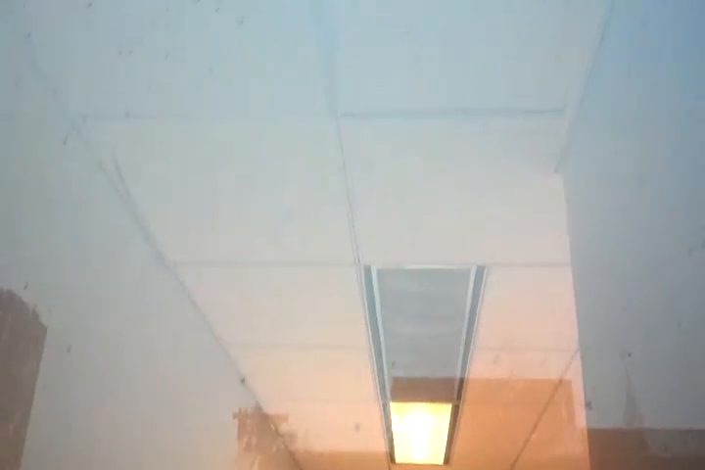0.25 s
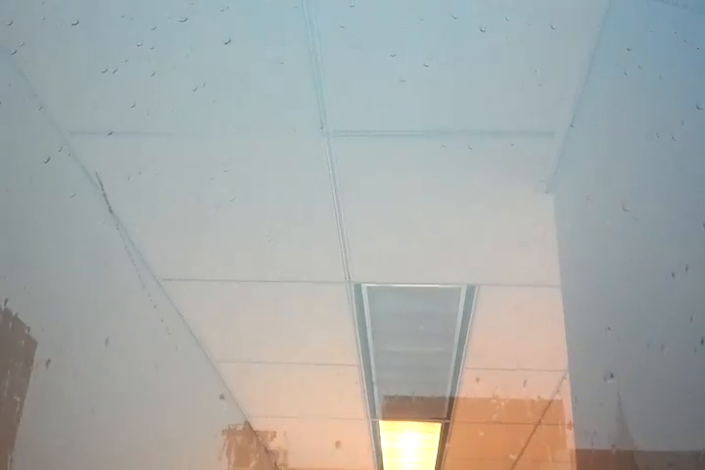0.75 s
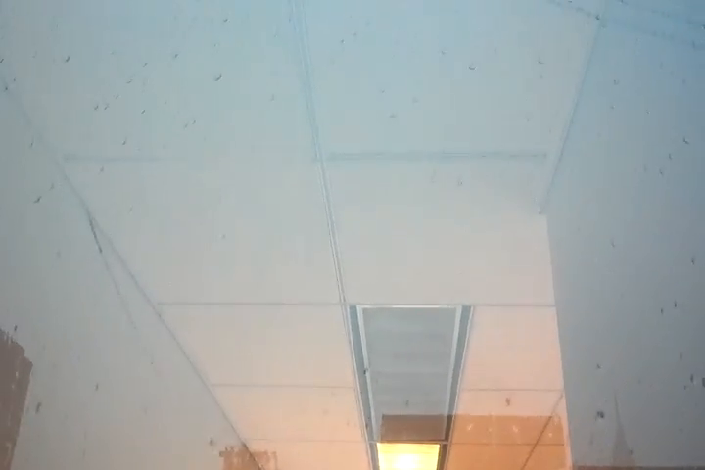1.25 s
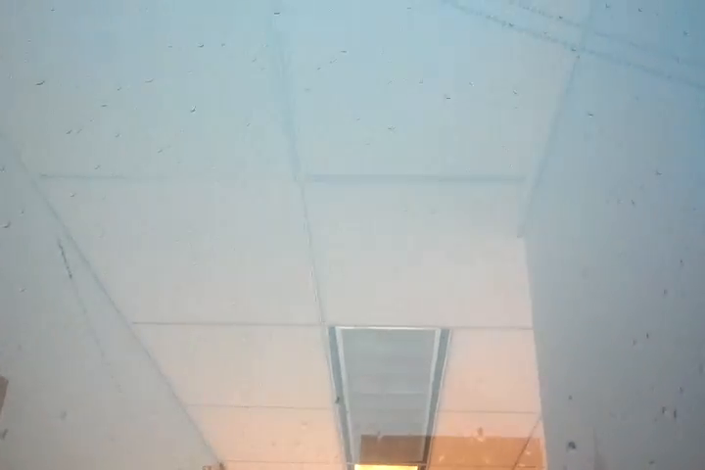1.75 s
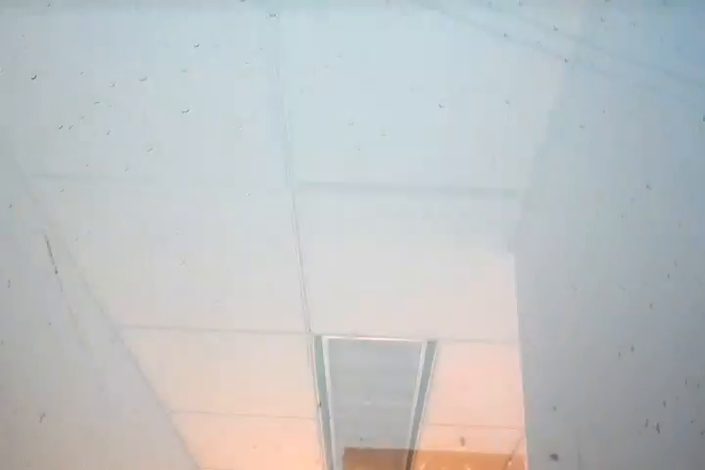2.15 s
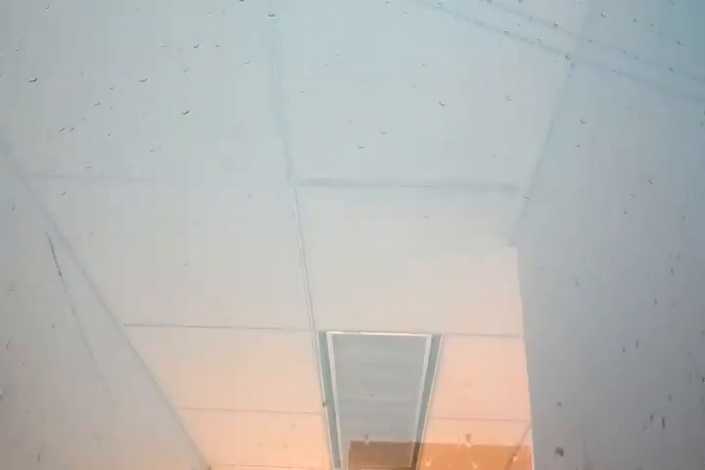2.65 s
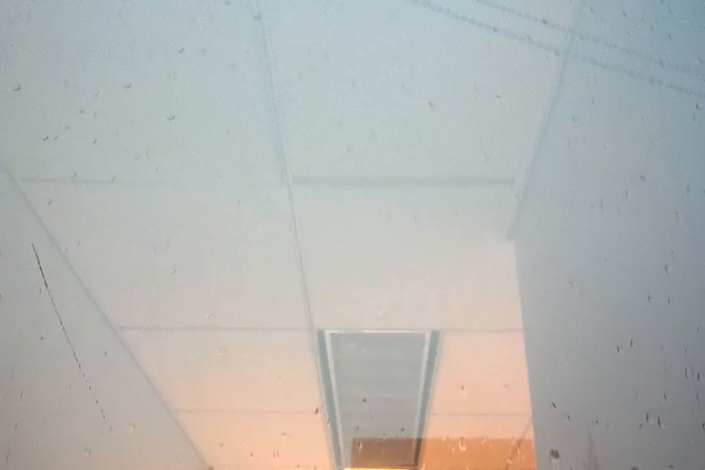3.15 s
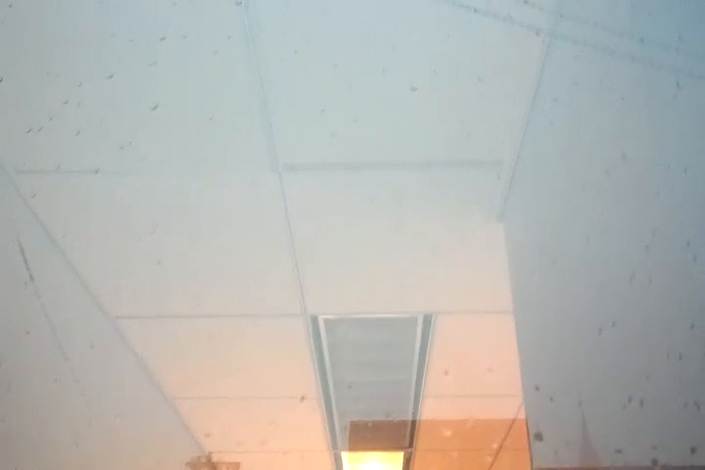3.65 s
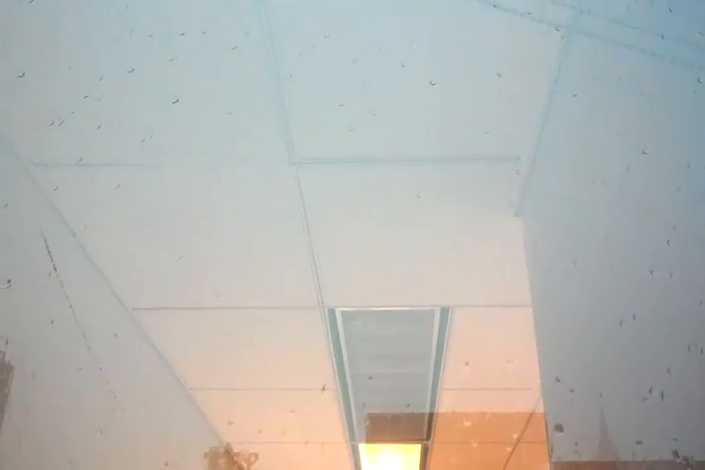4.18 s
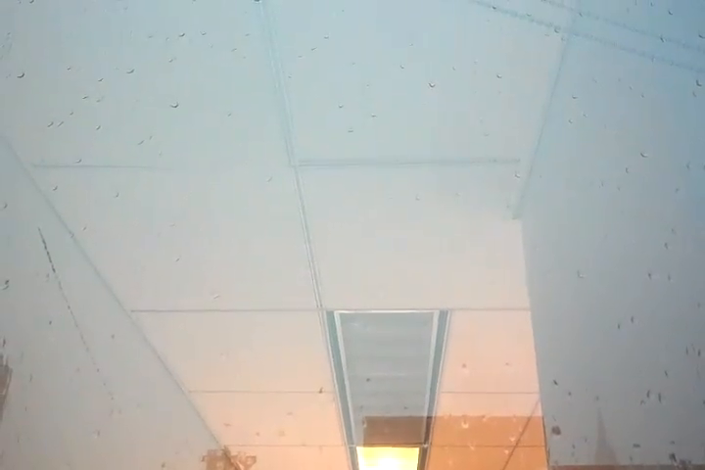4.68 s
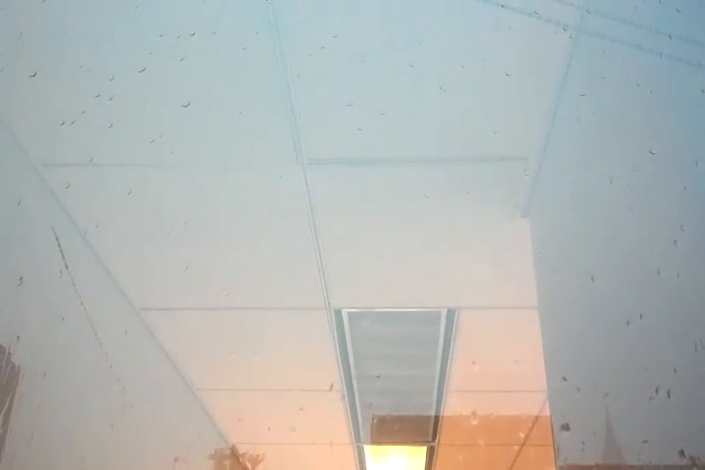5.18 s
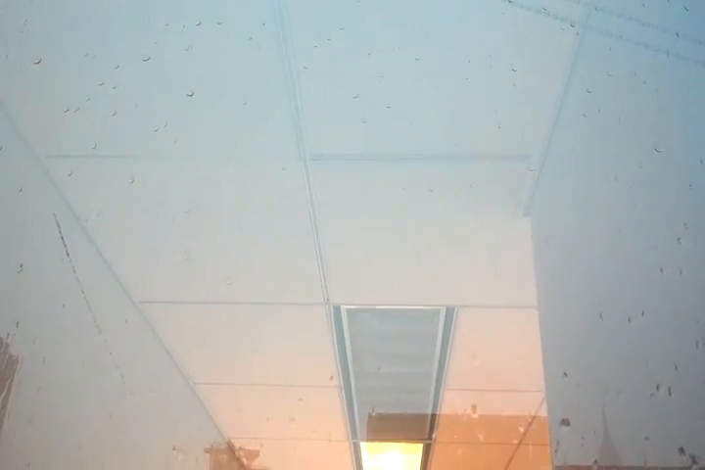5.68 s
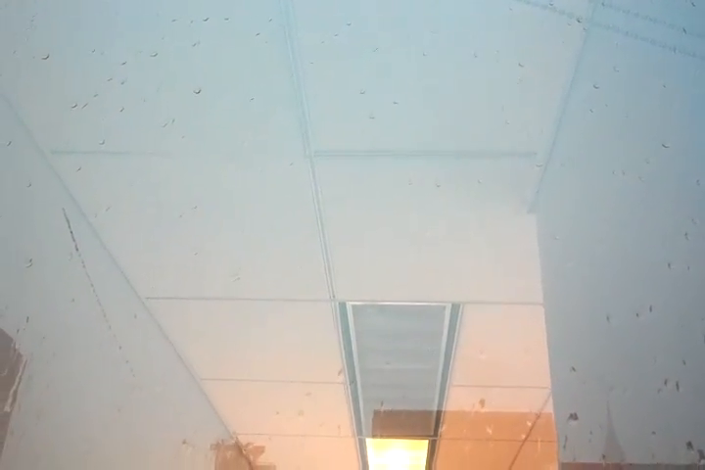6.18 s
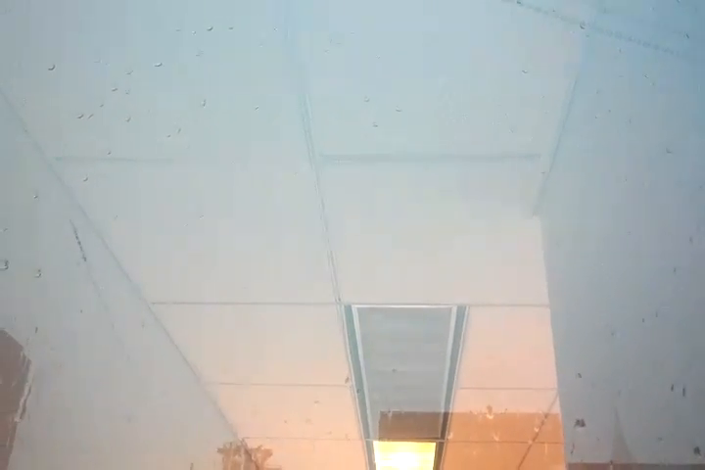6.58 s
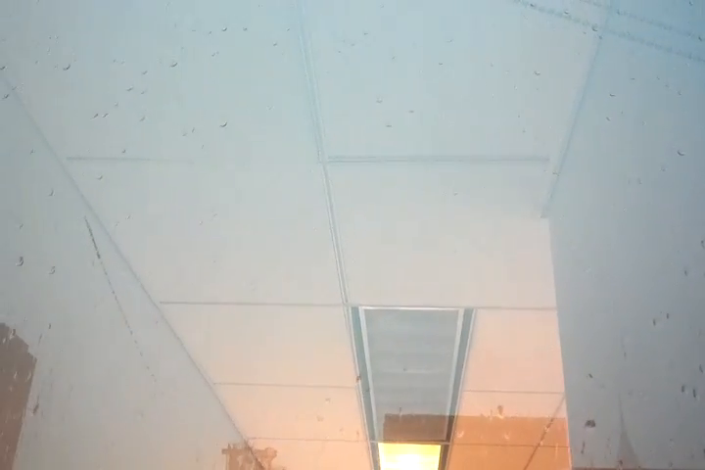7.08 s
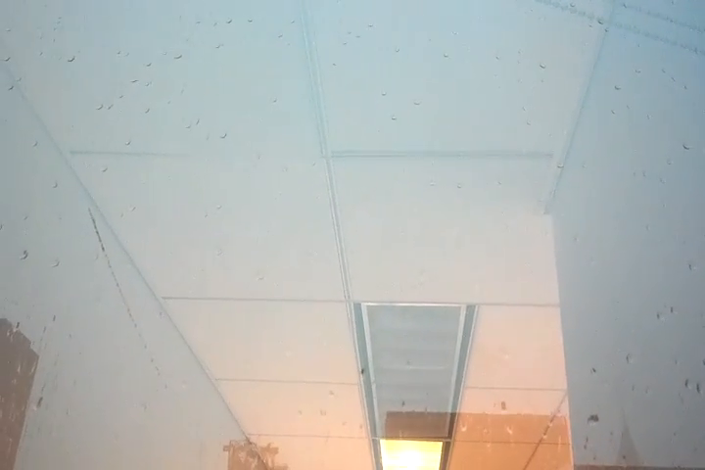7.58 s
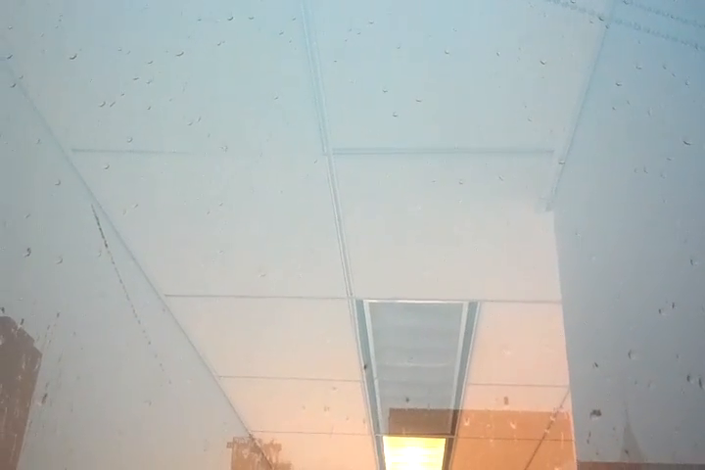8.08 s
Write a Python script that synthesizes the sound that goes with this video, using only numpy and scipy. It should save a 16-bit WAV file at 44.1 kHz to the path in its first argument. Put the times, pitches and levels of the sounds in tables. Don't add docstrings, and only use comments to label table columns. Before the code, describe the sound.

Heavy rain rushes outside a window over a low room rumble, drops ticking on the glass, after an early electrical click briefly ducks everything.

```python
import sys
import numpy as np
from scipy import signal
from scipy.fft import rfft, irfft
from scipy.io import wavfile
from scipy.ndimage import uniform_filter1d

SR = 44100
rng = np.random.default_rng(int(sys.argv[2]) if len(sys.argv) > 2 else 0)


def gain_from_decibels(decibels):
    exponent = np.asarray(decibels, float) / 20
    return 10 ** exponent


def persist_wave(psi):
    counts = np.round(np.clip(psi, -1, 1) * 32767).astype(np.int16)
    wavfile.write(sys.argv[1], SR, np.atleast_2d(counts).T)


N = 367284

# frequency in Hz, density in dB per Hz.
RUMBLE_SPECTRUM = [(25, -16), (45, -19.5), (75, -6), (105, 0), (150, -7.5), (190, 0), (240, -8.5),
                   (320, -10.5), (420, -19.5), (620, -19.5), (1000, -23.5), (1400, -23), (2200, -30.5)]
# frequency in Hz, width in Hz, peak in dB.
ROOM_MODES = [(108, 18, 3), (185, 34, 2.5), (340, 30, 4), (466, 22, 7), (624, 28, 9), (799, 36, 8.5),
              (930, 40, 6.5), (1160, 50, 3), (1526, 50, 6), (1990, 45, 15)]
# frequency
# in Hz, level against the first in dB, phase lead in rad, unshared part in dB.
SECOND_CAPSULE = [(60, -1.1, .07, -28), (110, -1.4, .15, -22), (150, -1.1, .1, -10), (185, -.2, .11, -18),
                  (230, 1.1, .17, -10), (340, -.4, .1, -14), (520, 1.5, .22, -10), (650, -2, .22, -10),
                  (1000, -1.5, .45, -10), (2000, 5, -1.9, -10)]
# peak in seconds, half length in seconds, centre in Hz, level over the rumble in dB.
THUNDER_ROLLS = [
    (2.07, .15, 91, 2),
    (2.453, .2, 183, -0.5),
    (3.5, 0.14, 190, -4),
    (4.15, .15, 75, -5),
    (5.95, 0.097, 80, -2),
    (6.65, 0.47, 85, -1.5),
    (7.35, 0.16, 90, -5),
]
# frequency in Hz, density in dB per Hz, first capsule minus second in dB.
RUSH_SPECTRUM = [(200, -55, -3), (344, -4.5, -3), (400, -8, 2), (910, -7, -3), (1440, -12, -2.5),
                 (1700, -1, -6), (2400, 1.5, 2.5), (3520, 0, -5.5), (4290, -2, 7.5), (5800, -1.5, -13),
                 (9300, -6, 6)]
# frequency in Hz, density in dB per Hz,
# first capsule minus second in dB.
HISS_SPECTRUM = [(300, -28, -4), (3030, -23.5, -10), (5800, -10, 14.5), (8860, -6.5, 4), (8640, 0, 10),
                 (9950, -3, -7.5), (10800, -5, -7.5), (12800, 1.5, -8), (13970, 4, -8), (16200, 7, -16.5),
                 (17400, -10, 6)]
# time in seconds, rumble over hiss in dB, rush over hiss in dB.
STORM = [(0, 10, 14), (.15, 11.5, 8), (.25, 8, 4.5), (.6, 9, 5.5), (1.65, 7.5, 7), (1.9, 11.5, 7),
         (2.5, 9, 8.5), (2.75, 10.5, 6), (3., 11, 9.5), (3.3, 8, 7), (4., 8, 8.5), (4.6, 7, 8),
         (5.3, 7.4, 6.2), (5.8, 7.5, 8), (7., 7.5, 6.6), (8.1, 6.4, 9), (8.33, 6.5, 5.5)]
# frequency in Hz, level in dB, t60 in seconds.
PANE_MODES = [(1168, 3, 0.061), (1514, -6.5, 0.069), (1796, 3, 0.098), (1980, -0.5, 0.16), (2225, -1, 0.12),
              (2450, 2.5, 0.064), (2640, -2.5, 0.13), (3054, -0.5, 0.14), (3120, -4.5, 0.036),
              (3190, 2.5, 0.063), (3340, 9, 0.069), (3580, 10, 0.046), (4110, 1, 0.18), (4930, -12, .05),
              (5500, -8, .05), (6300, -14, .04), (8800, -14, .03)]
# start in seconds, level over the rush in dB, centre in Hz, splash over the hiss in dB.
HEAVY_DROPS = [(0.769, 14, 2770, -6), (0.92, 11, 2760, -9), (1.013, 11, 2890, -2), (1.305, 14, 2500, -1),
               (1.369, 14, 2640, -15), (1.401, 9, 2680, -15), (1.759, 14.5, 2600, -4), (1.812, 7, 2600, -2),
               (1.847, 12.5, 2760, -4), (1.927, 19, 2710, -3), (1.978, 10, 2950, -15),
               (2.091, 17.5, 2600, 5.5), (2.105, 11, 2740, -5), (2.369, 13.5, 2500, -3),
               (2.76, 10, 2360, -13), (2.902, 15.5, 2580, 1), (3.005, 15, 2900, -10),
               (3.656, 8.5, 2550, -6), (4.055, 11.5, 2830, -1), (5.507, 13, 2500, -15),
               (5.579, 10, 2320, -11), (5.616, 12, 2530, -7), (5.639, 10, 2460, -10), (6.323, 8, 2630, -15),
               (6.464, 17, 2820, 0), (6.592, 9, 2740, -6), (7.989, 17.5, 2640, -3), (8.182, 11, 2350, -7),
               (8.222, 10.5, 2470, -10)]
# start in seconds, level over the rush in dB,
# centre in Hz, splash over the hiss in dB.
FAT_DRIPS = [
    (1.417, 5, 2410, -9),
    (4.344, 11.5, 2060, .5),
    (4.588, 10, 2640, -2),
    (5.869, 10, 1920, -12),
    (5.975, 11.5, 2380, -2),
    (6.34, 14.5, 3220, -2),
    (6.389, 10.5, 2520, -15),
    (6.741, 7, 2360, -11),
]
# start in seconds, level over the rush in dB.
LIGHT_DROPS = [(.53, 4), (.678, 7), (1.066, 9.5), (1.096, 2), (1.443, 7), (1.628, 5), (1.644, 7),
               (1.675, 4), (1.836, 9), (1.866, 8), (2.287, 3), (2.487, 10), (2.809, 9), (3.099, 7),
               (3.229, 8), (3.246, 6.5), (3.283, 7), (3.402, 4), (3.611, 6), (3.752, 8), (4.093, 5),
               (4.124, 5), (4.726, 1), (5.832, 6), (6.639, 4.5), (6.95, 6.5), (8.002, 8), (8.288, 5.5)]

CLICK_S = 0.16029
RING_SAMPLES = 4000


def set_rms(x, db):
    return x * gain_from_decibels(db) / np.sqrt(np.mean(x ** 2))


def random_walk(rate_hz):
    hold = int(SR / rate_hz)
    steps = np.repeat(rng.standard_normal(N // hold + 1), hold)
    slewed = uniform_filter1d(uniform_filter1d(steps, hold), hold)
    return 0.89 * slewed[:N]


def bin_hz():
    return np.arange(N // 2 + 1) * SR / N + 1


def at_bins(table, column=1):
    table = np.array(table)
    return np.interp(np.log(bin_hz()), np.log(table[:, 0]), table[:, column])


def flickering_noise(db, flicker_db, rate_hz):
    hz = bin_hz()
    spectrum = rfft(rng.standard_normal(N)) * gain_from_decibels(db)
    out = 0
    for centre_hz in 62.5 * 2.0 ** np.arange(9):
        share = np.cos(np.pi / 2 * np.clip(np.log2(hz / centre_hz), -1, 1)) ** 2
        if np.max(db[share > 0]) > np.max(db) - 40:
            flicker = gain_from_decibels(flicker_db * random_walk(rate_hz))
            out = out + flicker * irfft(spectrum * share, N)
    return out


def diffuse(table, flicker_db, rate_hz):
    db, tilt_db = at_bins(table), at_bins(table, column=2)
    pair = [flickering_noise(db + side * tilt_db / 2, flicker_db, rate_hz) for side in (1, -1)]
    return set_rms(np.array(pair), 0)


def hiss():
    return diffuse(HISS_SPECTRUM, flicker_db=1.1, rate_hz=22)


def room_rumble():
    hz, db = bin_hz(), at_bins(RUMBLE_SPECTRUM)
    for mode_hz, width_hz, peak_db in ROOM_MODES:
        db = db + peak_db / (1 + (2 * (hz - mode_hz) / width_hz) ** 2)
    shared, own = [rfft(set_rms(flickering_noise(db, 0.97, rate_hz=5), 0)) for _ in range(2)]
    offset_db, lead_rad, own_db = [at_bins(SECOND_CAPSULE, column) for column in (1, 2, 3)]
    second = shared * gain_from_decibels(offset_db) * np.exp(1j * lead_rad) + own * gain_from_decibels(own_db)
    return irfft([shared, second], N)


def thunder(room):
    width_oct = 0.45
    t, hz, spectrum = np.arange(N) / SR, bin_hz(), rfft(room)
    out = 0
    for peak_s, half_s, centre_hz, db in THUNDER_ROLLS:
        swell = np.exp(-((t - peak_s) / half_s) ** 2)
        band = np.exp(-(np.log2(hz / centre_hz) / width_oct) ** 2)
        out = out + gain_from_decibels(db) * swell * irfft(spectrum * band, N)
    return out


def rush():
    return diffuse(RUSH_SPECTRUM, flicker_db=2.0, rate_hz=10)


def storm_levels_db():
    s, *columns = np.transpose(STORM)
    return [np.interp(np.arange(N) / SR, s, column) for column in columns]


def burst(lo_hz, hi_hz, t60_s, noise):
    rise_s = 0.0014
    t = np.arange(noise.shape[-1]) / SR
    sos = signal.butter(2, [lo_hz, hi_hz], "bandpass", fs=SR, output="sos")
    band = set_rms(signal.sosfilt(sos, noise), 0)
    return band * (1 - np.exp(-t / rise_s)) * np.exp(-np.log(1000) * t / t60_s)


def pane_ring(centre_hz, chance, noise):
    spread_oct, swell_s, dispersion_s = 0.43, 0.0032, 0.00498
    hz, db, t60_s = np.array(PANE_MODES).T[:, :, None]
    t = np.arange(RING_SAMPLES) / SR
    off_centre_db = np.maximum(-6 * (np.log2(hz / centre_hz) / spread_oct) ** 2, -14)
    delay_s = dispersion_s * np.clip(np.log2(3600 / hz), 0, 2) * chance[0, 0]
    age = np.maximum(t - delay_s, 0)
    ring = gain_from_decibels(db + off_centre_db) * (1 - np.exp(-age / swell_s)) * np.exp(-np.log(1000) * age / t60_s)
    pitch_hz = hz * (1 + 0.031 * (chance[:, 1:2] - 0.5))
    both = []
    for c in (2, 3):
        mix = gain_from_decibels(17.0 * (chance[:, [c]] - 0.5))
        wave = np.sin(2 * np.pi * (pitch_hz * age + chance[:, [c + 2]]))
        both.append((ring * mix * wave).sum(axis=0))
    both = np.array(both)
    both = both / np.sqrt(np.mean(both[:, :300] ** 2))
    return both + gain_from_decibels(4.5) * burst(centre_hz / 1.48, centre_hz * 1.44, 0.11, noise)


def drop_rows():
    rows = [(*row, -2) for row in HEAVY_DROPS] + [(*row, 7.5) for row in FAT_DRIPS]
    scatter = rng.random(len(LIGHT_DROPS)) - 0.5
    for (s, db), luck in zip(LIGHT_DROPS, scatter):
        centre_hz = 2300 + 21 * db + 350 * luck
        rows.append((s, db, centre_hz, -9, -2))
    return rows


def single_drops():
    out = np.zeros((2, N + RING_SAMPLES))
    for s, db, centre_hz, splash_db, thud_db in drop_rows():
        chance = rng.random((len(PANE_MODES), 6))
        noise = rng.standard_normal((3, 2, RING_SAMPLES))
        hit = gain_from_decibels(db - 6.0) * pane_ring(centre_hz, chance, noise[0])
        hit += gain_from_decibels(splash_db + 16.5) * burst(4900, 17000, 0.11, noise[1])
        hit += gain_from_decibels(thud_db - 4.0) * burst(570, 1700, 0.082, noise[2])
        start = int(s * SR)
        out[:, start:start + RING_SAMPLES] += hit
    return out[:, :N]


def patter():
    out = np.zeros((2, N))
    for centre_hz in (1430, 2100, 2820, 3600):
        hits = (rng.random(N) < 60 / SR) * gain_from_decibels(2.2 * np.minimum(rng.exponential(size=N), 3))
        chance = rng.random((len(PANE_MODES), 6))
        small = pane_ring(centre_hz, chance, rng.standard_normal((2, RING_SAMPLES)))
        out += gain_from_decibels(-20.5) * signal.fftconvolve(hits[None], small, axes=1)[:, :N]
    return out


def scene():
    rumble_db, rush_db = storm_levels_db()
    room = room_rumble()
    background = gain_from_decibels(12.5) * hiss() + gain_from_decibels(rumble_db - 8.5) * (room + thunder(room))
    return background + gain_from_decibels(rush_db - 4.5) * rush() + gain_from_decibels(-3.0) * (single_drops() + patter())


def gain_control_db():
    settled_db, start_db, start_s = -50.5, 3, 0.031
    slam_db, slam_s, rebound_db, rebound_s = -77, 0.001, 2, 0.088
    recover_db_per_s, knee_db = 8.5, 0.5
    t = np.arange(N) / SR
    since = np.maximum(t - CLICK_S, 0)
    before = settled_db + start_db * np.exp(-t / start_s)
    climb = slam_db + rebound_db * (1 - np.exp(-since / rebound_s)) + recover_db_per_s * since
    after = -knee_db * np.logaddexp(-climb / knee_db, -settled_db / knee_db)
    return before + (after - before) * np.minimum(since / slam_s, 1)


def add_click(capsules):
    capsules[0, round(CLICK_S * SR) + np.arange(2)] -= 0.49 * np.array([0.35, 0.65])


def roll_off(x):
    return signal.sosfilt(signal.butter(12, 17040, fs=SR, output="sos"), x)


def record(dry):
    top_hz, lag_samples, bass_pole = 15770, 16, 0.945
    lowpass = signal.firwin(801, top_hz, fs=SR, window="blackman")
    capsules = signal.fftconvolve(dry, lowpass[None], "same", axes=1)
    capsules *= gain_from_decibels(gain_control_db() - 6.0)
    add_click(capsules)
    late_other = np.pad(capsules, ((0, 0), (lag_samples, 0)))[::-1, :N]
    steered = signal.lfilter([1], [1, -bass_pole], capsules - late_other)
    return roll_off(steered)


dry = scene()
out = record(dry)
persist_wave(out)
```